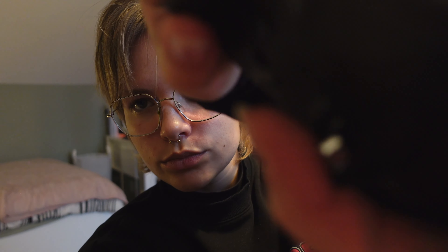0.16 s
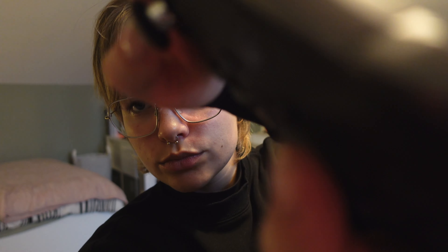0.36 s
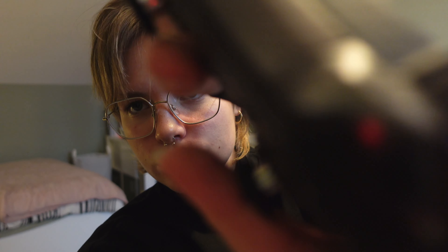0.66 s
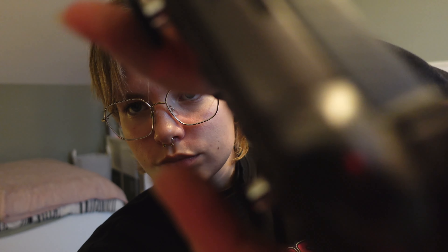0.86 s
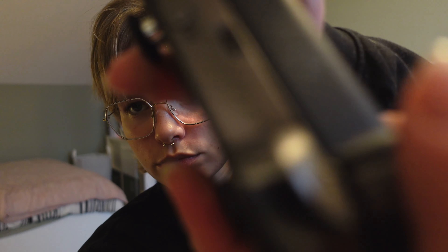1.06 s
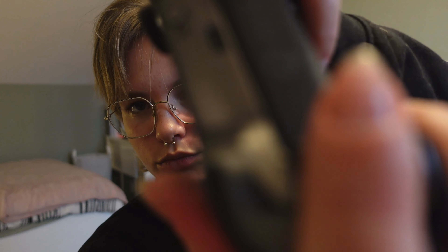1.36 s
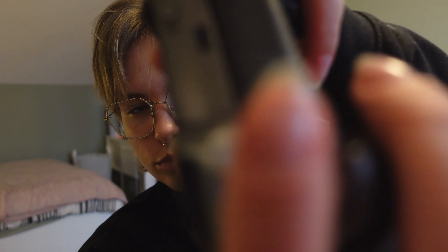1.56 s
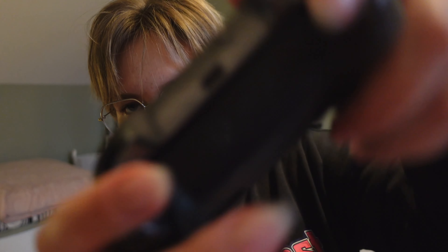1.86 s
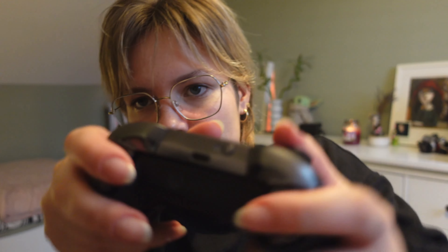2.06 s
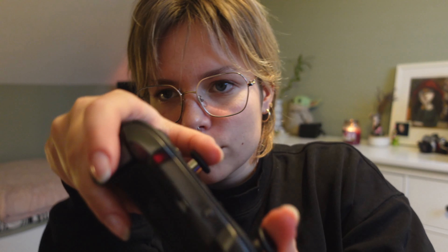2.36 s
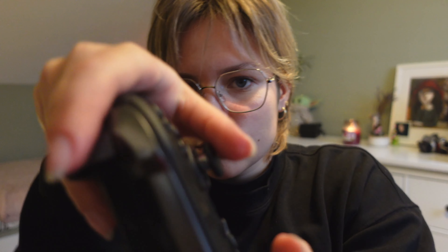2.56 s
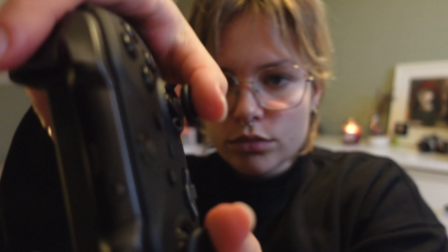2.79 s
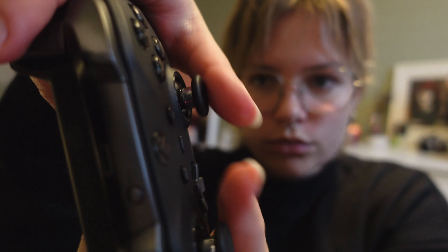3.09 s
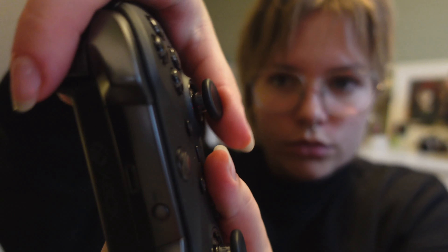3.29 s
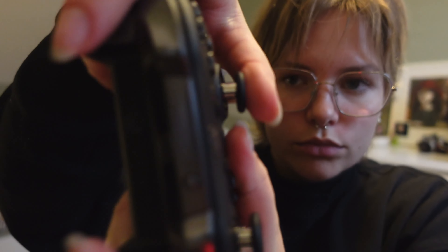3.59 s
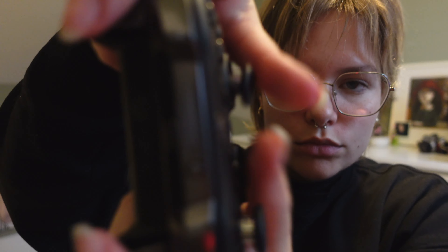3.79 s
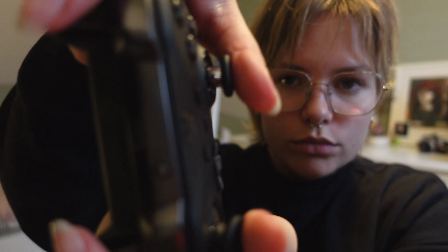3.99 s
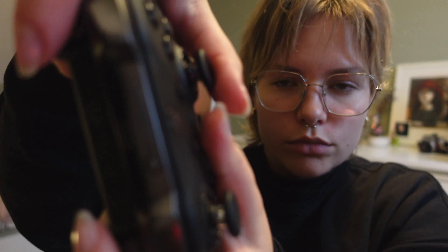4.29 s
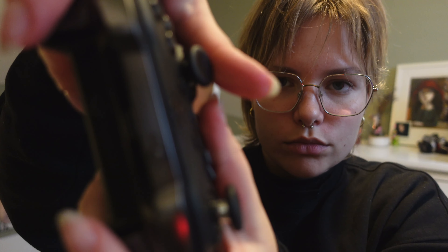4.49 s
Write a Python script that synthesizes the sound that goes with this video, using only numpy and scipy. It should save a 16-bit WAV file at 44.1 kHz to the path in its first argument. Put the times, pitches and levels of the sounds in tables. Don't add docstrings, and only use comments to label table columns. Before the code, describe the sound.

An irregular run of dry, bright plastic clicks: button snaps, stick taps on the rim, spring-back knocks and tiny fingernail ticks. Early trigger strokes leave a thin springy ring; later clicks cluster densely toward the end. Skin slides softly on plastic. Close miking, a short soft room reflection, quiet air noise behind, dipping slightly after loud clicks.

```python
import sys
import numpy as np
from scipy import signal
from scipy.fft import rfft, irfft, next_fast_len
from scipy.io import wavfile
from scipy.ndimage import uniform_filter1d

SR = 44100
rng = np.random.default_rng(int(sys.argv[2]) if len(sys.argv) > 2 else 0)


def transcribe(signal):
    frames = np.atleast_2d(signal).T
    limited = np.clip(frames, -1, 1)
    pcm = np.round(limited * 32767).astype(np.int16)
    wavfile.write(sys.argv[1], SR, pcm)


def linear_from_db(decibels):
    return 10 ** (np.asarray(decibels, float) / 20)


N = 204668


def unit(x):
    return x / np.sqrt(np.mean(x ** 2) + 1e-20)


def along(points, hz):
    f, v = np.transpose(points)
    return np.interp(np.log(hz + 1), np.log(f + 1), v)


def curves(rows):
    s, *cols = np.transpose(rows)
    return [np.interp(np.arange(N) / SR, s, c) for c in cols]


def filtered(x, response):
    m = next_fast_len(x.shape[-1] + 8192)
    spectrum = rfft(x, m) * response(np.fft.rfftfreq(m, 1 / SR))
    return irfft(spectrum, m)[..., :x.shape[-1]]


# (frequency [Hz], left-right likeness [0..1])
ALIKE = [(60, .95), (180, .82), (400, .85), (1650, .88), (4000, .92), (6000, .985), (8000, 1)]


def rush(gain, patchy_db):
    z = signal.stft(rng.standard_normal((2, N + 512)), nperseg=512)[2]
    field = uniform_filter1d(rng.standard_normal(z.shape[1:]), size=5, axis=0)
    field = uniform_filter1d(field, size=8, axis=1)
    pair = signal.istft(z * linear_from_db(patchy_db * unit(field)), nperseg=512)[1][:, :N]

    def response(hz):
        turn = np.arccos(np.clip(along(ALIKE, hz), -1, 1)) / 2
        return gain(hz) * [np.cos(turn), np.sin(turn)]

    mid, side = filtered(pair, response)
    return unit(np.array([mid + side, mid - side]))


# (frequency [Hz], density [dB per Hz])
VENT = [(30, -68), (70, -45), (120, -25), (634, -2.5), (2820, -3.5), (3460, -11.5), (6000, -21),
        (13000, -39)]
# (frequency [Hz], width [Hz], level [dB])
DUCT = [(374, 20.7, 8.5), (633, 35, -2.5), (1071, 73, 4), (2520, 300, 0)]
# (frequency [Hz], density [dB per Hz])
HISS = [(100, -39), (400, -21), (1760, -46), (3000, -6), (4960, -9), (15100, -13), (15800, -17),
        (16100, -68)]


def background():
    vent_db, hiss_db, hiss_top_hz = -52, -66.5, 15900

    def vent_gain(f):
        hum = sum(linear_from_db(2 * (db + 1)) / (1 + (2 * (f - c) / w) ** 2) for c, w, db in DUCT)
        return linear_from_db(along(VENT, f)) * np.sqrt(1 + hum)

    vent = rush(vent_gain, patchy_db=1.5)
    hiss = rush(lambda f: linear_from_db(along(HISS, f)) * (f < hiss_top_hz), patchy_db=.3)
    return linear_from_db(vent_db) * vent + linear_from_db(hiss_db) * hiss


# (time [s], level [dB])
FINGERS = [(0.0, -72), (0.43, -96), (0.76, -53.5), (0.89, -73), (1.41, -65.5), (1.61, -60), (2.3, -66.5),
           (3.66, -76.5), (4.08, -61), (4.38, -103), (4.64, -58)]
# (frequency [Hz], density [dB per Hz])
SKIN = [(300, -70), (900, -17), (2000, 6.5), (4000, -6), (7000, -9.5), (11000, -17), (15500, -15),
        (15900, -60)]


def fingers():
    slow = uniform_filter1d(rng.standard_normal(N), size=90) * np.sqrt(90)
    slips = linear_from_db(9 * slow / 2)
    friction = rush(lambda f: linear_from_db(along(SKIN, f)), patchy_db=1.5)
    return linear_from_db(curves(FINGERS)[0] + 6.0) * unit(slips * friction)


# (time [s], strength [dB], hardness [dB], looseness of grip [dB])
TAPS = [(.0213, -57, -7, 6), (.0901, -27.5, -9.5, -9.5), (.6145, -38.5, -12, 0), (.6256, -42, -9.5, -18),
        (.705, -46, -8, 1), (.7495, -50, -12, -26), (2.2077, -49.5, -10, -5), (2.256, -55.5, 3, -21),
        (2.261, -35.5, -11, -9), (2.2823, -43.5, -10, -13), (2.2954, -42, -31, -30), (3.2218, -39, -11, -4),
        (3.5213, -69, -3, -2), (3.527, -34, -17, -5), (3.712, -27, -9, -10.5), (4.0503, -28, -6, -6.5),
        (4.1086, -23.5, -9, -12), (4.592, -33.5, -0.5, -3), (4.6032, -49.5, 3, 5)]
# (time [s], strength [dB], hardness [dB], looseness [dB])
SNAPS = [(.1365, -29, -2.5, -5.5), (.7082, -40, 2.5, -14), (.764, -26, 2, -3), (1.063, -24.5, 0, -4),
         (1.3639, -25, 0, -3.5), (1.7278, -30, -7.5, -3), (1.8014, -38, -12, -61),
         (1.9692, -41.5, 3.5, 2.5), (1.9938, -30.5, -7, -3.5), (2.0609, -29.5, -1, -6),
         (2.0873, -26.5, -5, -8.5), (2.3625, -38.5, -9, -14), (2.3846, -36, -6, -2.5),
         (2.8817, -26.5, -0.5, -5), (3.2897, -35, 0.5, -1.5), (3.3223, -30, 0.5, -4.5),
         (3.3859, -33, -11, -7), (3.6527, -34.5, 2.5, -1.5), (4.2263, -33.5, 2, -1), (4.2633, -42.5, 3, -3),
         (4.4139, -32, -6.5, -5)]
# (time [s], strength [dB], hardness [dB], looseness [dB])
KNOCKS = [(.3502, -39.5, -7.5, -7), (.739, -50, -10, -4), (.8435, -24, 3, -3.5), (1.1136, -23.5, 3, -3),
          (1.3147, -46, -8, -7), (1.5197, -31, -30, -27), (1.6027, -48.5, -2.5, -2.5),
          (1.6674, -26, -6.5, -19), (1.7314, -34, -10, -12), (1.7748, -37.5, -5, -11),
          (2.3775, -36.5, -6.5, -16), (2.781, -32.5, -2, -4.5), (3.7344, -33.5, -4, -3),
          (4.0164, -26, -11.5, -9), (4.3101, -26, -1, -8), (4.3563, -45, -20, -16), (4.598, -35, -11, -11)]
# (time [s], strength [dB], hardness [dB], looseness [dB])
NAILS = [
    (.388, -61, -1, 8),
    (.6894, -47.5, -1.5, -19),
    (1.5587, -55, -7, 0),
    (1.819, -43, -12, -35),
    (3.2237, -35.5, -5.5, 0),
    (3.4831, -47.5, -2.5, -6),
    (3.5082, -48, 4, 2),
    (4.2154, -42, -3.5, -2.5),
    (4.2489, -35, -7, -8),
]
# (time [s], strength [dB], hardness [dB], looseness [dB])
SETTLES = [(.6687, -50.5, -13, -21), (.7217, -42.5, -22, -1), (1.565, -47.5, -13, -8),
           (1.614, -45.5, -13, 8.5), (1.8043, -49, -5, 0.5), (2.067, -56.5, 8, 15),
           (2.5727, -46.5, -14.5, -22), (2.857, -52.5, -9, 4), (3.1182, -56, -18, -13),
           (3.5412, -54, -6.5, 2), (3.7088, -69, 9, 12), (3.8538, -45.5, -5, -5.5), (3.8695, -60, -4, -9)]
# (contacts, shell [dB], plate [dB], cap [dB], tick [dB], extra shell [dB per dB strength])
KINDS = [
    (SNAPS, -0.34, 0.38, 0.3, -5.5, .01),
    (KNOCKS, 0.1, -6.5, 0.12, -6, 0.0093),
    (TAPS, -9, 0.67, 1, -2.5, 0.17),
    (NAILS, -1.7, 0.54, -1, 0.1, .01),
    (SETTLES, 0.1, 0.64, 0.1, 8.5, .01),
]


def contacts():
    firm_db = -35
    plate_follows, tick_follows = 0.18, 1.43
    rows_out = []
    for rows, shell, plate, cap, tick, grows in KINDS:
        for s, db, hard, loose in rows:
            shell_db = db + shell + grows * (db - firm_db)
            plate_db = db + plate + plate_follows * hard
            tick_db = db + tick + tick_follows * hard
            rows_out.append((s, shell_db, db + loose, plate_db, db + cap + hard, tick_db))
    return rows_out


# (time [s], hollow [Hz], shell [Hz], cap [Hz])
GRIPS = [(.09, 869, 1710, 3600), (.136, 886, 1560, 3600), (.764, 953, 1710, 3560), (.843, 807, 1820, 4150),
         (1.063, 956, 1670, 3850), (1.113, 877, 1930, 3880), (1.364, 864, 1710, 3500),
         (1.667, 900, 1670, 3480), (1.728, 929, 1830, 4230), (1.994, 883, 1770, 4670),
         (2.061, 805, 1760, 4300), (2.087, 802, 1860, 3880), (2.385, 1020, 2050, 3490),
         (2.781, 1000, 1700, 4080), (2.882, 982, 1820, 3570), (3.224, 929, 1500, 3500),
         (3.29, 1120, 1960, 4410), (3.322, 799, 1700, 3570), (3.386, 877, 1910, 3650),
         (3.527, 1060, 1820, 3540), (3.653, 824, 1990, 4100), (3.712, 875, 1530, 4550),
         (3.734, 1030, 1980, 4110), (4.016, 966, 1770, 3500), (4.05, 880, 1470, 4570),
         (4.109, 850, 1920, 4540), (4.226, 799, 1800, 4080), (4.31, 799, 1680, 4070),
         (4.414, 939, 1840, 4270), (4.592, 926, 2030, 3780)]
# hollow [Hz], shell [Hz], cap [Hz]
FREE_HZ = (870, 1760, 3900)


def bends(s):
    _, *held_hz = min(GRIPS, key=lambda row: abs(row[0] - s))
    hollow, shell, cap = np.divide(held_hz, FREE_HZ)
    return shell, hollow, 1, cap, 1


def contact(rattle_s):
    u = np.arange(400) / SR / rattle_s
    taps = rng.standard_normal(400) ** 3 * np.exp(-u)
    taps[4] += 20
    return taps


def ring(modes, bend, scatter_db, detune, rattle_s):
    t = np.arange(1200) / SR
    hz, width, db = np.transpose(modes)[:, :, None]
    hz = hz * bend
    luck = rng.standard_normal((2, len(modes), 1))
    waves = np.sin(2 * np.pi * hz * (1 + detune * luck[0]) * t) * np.exp(-np.pi * width * t)
    waves = waves * (1 - np.exp(-.9 * hz * t))
    struck = np.sum(linear_from_db(db + scatter_db * luck[1]) * waves, axis=0)
    near = np.convolve(struck, contact(rattle_s))[:1200]
    around = np.sum(linear_from_db(db) * waves * np.exp(-hz * t / 1.3), axis=0)
    return np.array([near / np.linalg.norm(near), around / np.linalg.norm(around)])


# (frequency [Hz], t60 [s])
ROOM = [(400, 0.025), (1000, 0.16), (2500, 0.13), (6000, 0.23), (14000, 0.081)]


def tail(count):
    hz, t, z = signal.stft(rng.standard_normal((2, count)), SR, nperseg=128)
    z[1] *= 0.23 / (1 + (hz[:, None] / 7000) ** 4)
    ragged = linear_from_db(2.0 * rng.standard_normal(len(t)))
    decay = linear_from_db(-60 * t / along(ROOM, hz)[:, None])
    mid, side = signal.istft(z * ragged * decay, SR, nperseg=128)[1][:, :count]
    late = 1 - np.exp(-np.arange(count) / SR / 0.0032)
    answer = np.array([mid + side, mid - side]) * late
    return answer / np.linalg.norm(answer[0])


# (frequency [Hz], width [Hz], level [dB])
SHELL = [(1420, 220, -13), (1610, 150, -6), (1760, 130, 0), (1920, 150, -5)]
HOLLOW = [(720, 170, -11), (870, 110, 0), (1010, 150, -7)]
PLATE = [(2330, 170, -3), (2550, 180, -7), (2770, 140, 0), (3130, 220, -4)]
CAP = [(3500, 260, -4), (3900, 190, 0), (4220, 230, -3), (4700, 350, -9), (5200, 400, -8)]
TICK = [(5835, 354, 5), (6545, 326, 2), (7060, 645, 9.5), (9030, 490, 2), (9800, 860, 2), (11140, 400, -8),
        (13700, 3800, -9)]
# (time [s], left over right [dB])
SIDE_OF = [
    (0.0, -2),
    (2.92, 1),
    (4.64, 1),
]


def controller():
    out = np.zeros((2, N + SR))
    pan_db = curves(SIDE_OF)[0]
    parts = [(SHELL, .0004), (HOLLOW, .0004), (PLATE, .0006), (CAP, .0007), (TICK, .0011)]  # (modes, rattle s)
    for s, *levels_db in contacts():
        at, around = round((s - .0003) * SR), 0
        for (modes, rattle_s), db, bend in zip(parts, levels_db, bends(s)):
            near, blur = linear_from_db(db + 24) * ring(modes, bend, scatter_db=1.8, detune=.012, rattle_s=rattle_s)
            lean_db = pan_db[at] + .8 * rng.standard_normal()
            out[:, at:at + len(near)] += near * linear_from_db(lean_db * np.array([[.5], [-.5]]))
            around = around + blur
        wet = signal.fftconvolve(around[None], tail(count=9000), axes=1)
        out[:, at:at + wet.shape[1]] += linear_from_db(-12.5) * wet
    no_bass = signal.butter(N=6, Wn=600, btype="high", fs=SR, output="sos")
    return signal.sosfilt(no_bass, out[:, :N])


# (time [s], level [dB])
THUMPS = [
    (0.133, -70),
    (0.764, -49.5),
    (0.842, -89),
    (1.114, -57),
    (1.361, -69),
    (1.99, -64),
    (3.32, -106),
    (4.05, -86),
]


def thumps():
    out, u = np.zeros(N + SR), np.arange(600) / SR / 0.000094
    for s, db in THUMPS:
        out[round((s + .002) * SR):][:600] += linear_from_db(db + 27.5) * u * np.exp(-u)
    return out[:N]


# (frequency [Hz], level [dB], t60 [s])
SPRING = [(4130, 1.5, 0.31), (5520, 1, 0.22), (7500, -9, 0.13), (8250, -4, .2), (9300, -7, .22),
          (10200, -2, 0.11)]
# (time [s], level [dB], tilt [dB per octave])
TWANGS = [
    (0.762, -45.5, -1),
    (1.063, -45.5, 2),
    (1.364, -47.5, -4),
    (1.993, -61.5, 14),
]


def springs():
    out, t = np.zeros(N), np.arange(9000) / SR
    hz, level, t60 = np.transpose(SPRING)[:, :, None]
    for s, db, tilt_db in TWANGS:
        drift = .24 * np.cumsum(rng.standard_normal((len(SPRING), len(t))), axis=1)
        decay = linear_from_db(level + tilt_db * np.log2(hz / hz[0]) - 60 * t / t60)
        waves = decay * np.sin(2 * np.pi * hz * t + drift)
        out[round(s * SR):][:len(t)] += linear_from_db(db) * waves.sum(axis=0)
    return out


def scene():
    return background() + fingers() + controller() + thumps() + springs()


def band_limit(x):
    return signal.sosfilt(signal.butter(12, 16820, fs=SR, output="sos"), x)


def record(dry):
    grab_s, let_go_s, knee_db, squeeze = 0.0039, 0.1, -43.5, 0.19
    t = np.arange(SR) / SR
    memory = np.exp(-t / let_go_s) * (1 - np.exp(-t / grab_s)) / SR
    load = np.abs(signal.fftconvolve(np.mean(dry ** 4, axis=0), memory)[:N])
    capsule = dry + linear_from_db(-41) * dry ** 2
    capsule = filtered(capsule, lambda hz: 1 / (1 + (hz / 16500) ** 90))
    mix = capsule / (1 + load / linear_from_db(knee_db) ** 2 * 100) ** squeeze
    return band_limit(mix)


dry = scene()
out = record(dry)
transcribe(out)
```